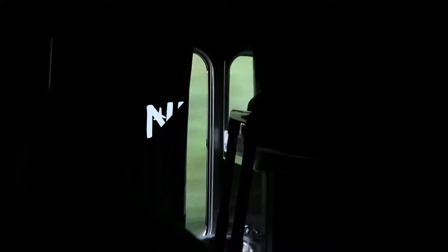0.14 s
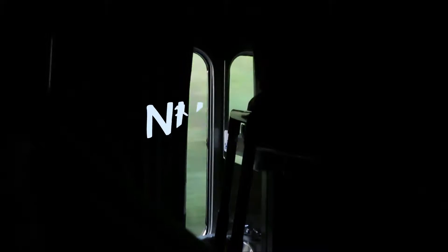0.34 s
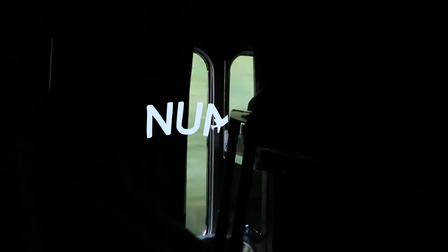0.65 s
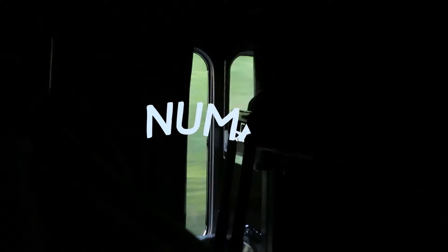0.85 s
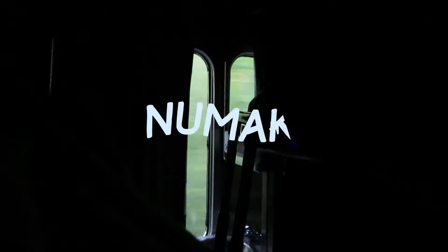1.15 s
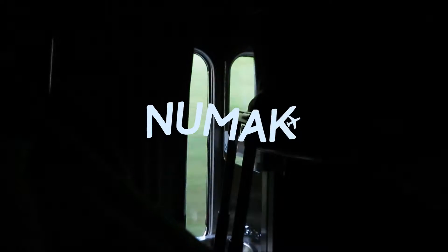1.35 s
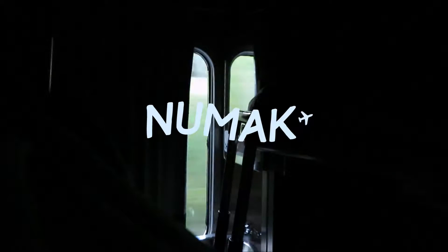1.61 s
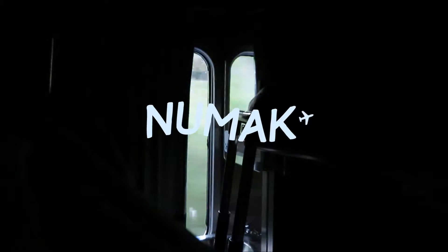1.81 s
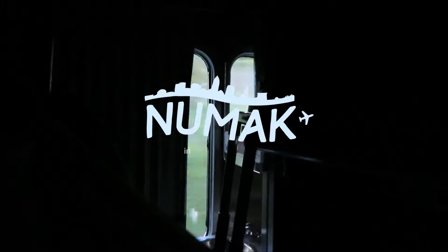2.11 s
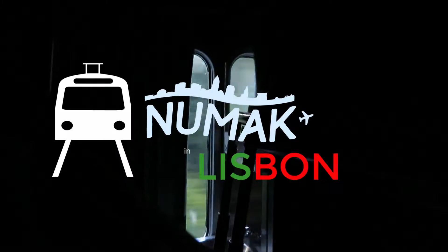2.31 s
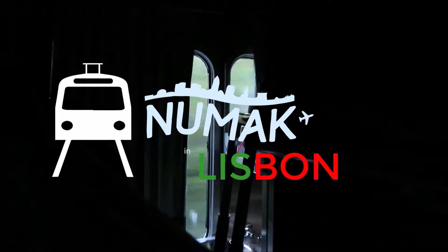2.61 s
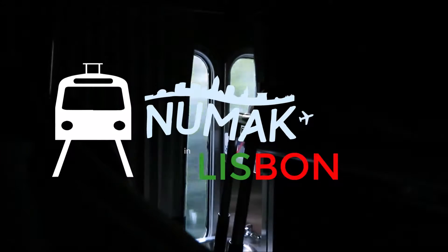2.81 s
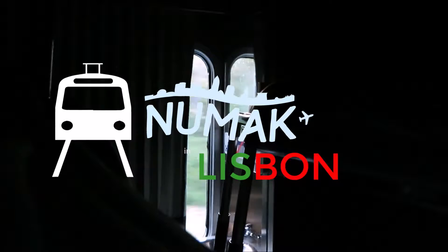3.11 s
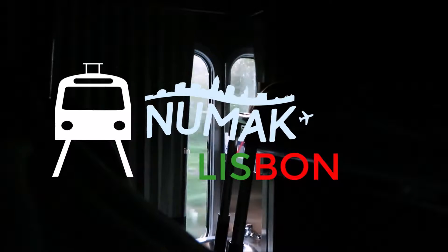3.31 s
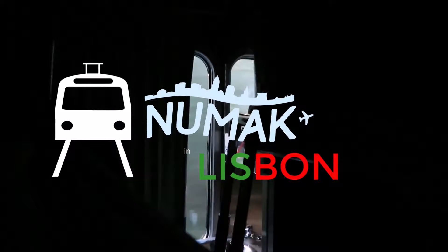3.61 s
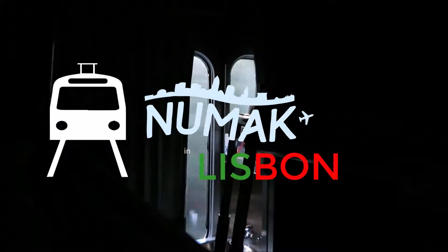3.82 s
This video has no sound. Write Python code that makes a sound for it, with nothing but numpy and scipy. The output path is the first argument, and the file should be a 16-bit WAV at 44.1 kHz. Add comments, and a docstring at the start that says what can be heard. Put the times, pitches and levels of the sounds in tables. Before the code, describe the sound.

A moving train heard from inside its carriage: continuous deep rumble and muffled rolling roar, wavering low hum, scattered dull knocks clustering past the middle, close stereo microphones, mostly centred low end.

```python
"""Wheels roll on rails, heard inside a moving train carriage as panel-coloured broadband noise.
The body booms and the floor drones as bands of noise; a low pulsation hums as sines in four orders.
Wall panels hum in two neighbouring bands, and fittings knock as decaying bands of noise.
Short gusts hiss past the door over a steady hiss of air, with one faint high tick."""
import sys
import numpy as np
from scipy import signal
from scipy.fft import rfft, irfft
from scipy.io import wavfile
from scipy.ndimage import uniform_filter1d

SR = 44100
rng = np.random.default_rng(int(sys.argv[2]) if len(sys.argv) > 2 else 0)


def digitize_waveform(pressure):
    """Quantize a signal to 16-bit integers and store it at the path in sys.argv[1].

    Rows of a 2-D input are taken as channels; values are limited to [-1, 1].
    """
    field = np.atleast_2d(pressure).T
    bounded = np.clip(field, -1, 1)
    quanta = np.round(bounded * 32767).astype(np.int16)
    wavfile.write(sys.argv[1], SR, quanta)


N = 174195  # length in samples


def amp(db):
    """Level law: amplitude ratio is 10^(level/20)."""
    return 10 ** (np.asarray(db) / 20)


def evened(x):
    """Normalization to unit rms."""
    return x / np.sqrt(np.mean(x ** 2) + 1e-20)


def read(points, hz, axis=1):
    """Linear interpolation of a table column along a logarithmic frequency axis."""
    table = np.array(points)
    return np.interp(np.log(hz + 1), np.log(table[:, 0] + 1), table[:, axis])


def curve(points, axis=1):
    """Linear interpolation of a table column over time."""
    table = np.array(points)
    return np.interp(np.arange(N) / SR, table[:, 0], table[:, axis])


def spectrum(points):
    """Spectral shape: gain over frequency from a table, zero outside its end points."""
    return lambda hz: amp(read(points, hz)) * (hz > points[0][0]) * (hz < points[-1][0])


def filtered(x, gain):
    """Zero-phase linear filtering: the spectrum is multiplied by a gain of frequency."""
    frequencies = np.fft.rfftfreq(x.shape[-1], 1 / SR)
    return irfft(rfft(x) * gain(frequencies), x.shape[-1])


def coloured(x, gain):
    """Spectral shaping of a mid/side pair, normalized to unit rms in the mid."""
    y = filtered(x, gain)
    return y / np.sqrt(np.mean(y[0] ** 2))


def slow(top_hz):
    """Low-pass random modulation of unit rms, with gain one half at top_hz."""
    lowpass = lambda hz: (hz > 0) / (1 + (hz / top_hz) ** 4)
    return evened(filtered(rng.standard_normal(N), lowpass))


# Close microphone pair: f/Hz, side re mid level/dB, correlation of side and mid [-1 to 1]
MICROPHONE_PAIR = [(100, -81, 0.01), (180, -76, 0.01), (260, -44, -.03), (335, -18.5, -0.16),
                   (503, -22.5, -0.16), (860, -18, -.65), (1300, -17, -.05), (2120, -17.5, -.1),
                   (3360, -7.5, -0.098), (6000, -4, -0.014), (12000, 1, 0.01)]


def pair():
    """Partial coherence: white noise as a mid and a partly correlated side, weaker at most frequencies."""
    mid, other = rng.standard_normal((2, N))
    correlation = lambda hz: np.clip(read(MICROPHONE_PAIR, hz, axis=2), -1, 1)
    independent = lambda hz: np.sqrt(1 - correlation(hz) ** 2)
    side = filtered(mid, correlation) + filtered(other, independent)
    side = filtered(side, lambda hz: amp(read(MICROPHONE_PAIR, hz)))
    return np.array([mid, side])


# Rolling roar over time: t/s, level/dB
ROAR_LEVEL = [(0.05, -42), (1.11, -42), (1.34, -41.5), (1.84, -41.5), (2.29, -41), (2.71, -41), (3.95, -41)]
# Spectral density of the roar before the panels: f/Hz, relative level/dB
ROAR_SPECTRUM = [(150, -8.5), (270, 2), (427, -4.5), (560, -6), (880, -10), (1190, -13.5), (2100, -17),
                 (2520, -20), (3100, -28), (4000, -39.5), (6000, -57.5)]
# Panels rung by the roar: centre f/Hz, width at half the lift f/Hz, lift level/dB
PANEL_RESONANCES = [(469.4, 8.6, 9), (704, 35, 4.5), (800, 21, 0.5), (1034, 77, 3.5), (1277, 35, 3),
                    (1455, 25, 7.5), (1590, 21, 6.5), (1698, 72, 3), (1826, 26, 6), (2000, 45, 7.5),
                    (2214, 39, 4.5), (2724, 37, 8.5), (2910, 30, 8.5), (372.7, 6.3, 3)]
PATCH_DB, FLICKER_DB = 1, 0.14  # rms


def roar():
    """Resonant transmission: rolling noise through panels, with drifting patches and a shared flicker."""
    bins = signal.stft(pair(), nperseg=512, noverlap=384)[2]
    patches = rng.standard_normal(bins.shape[1:])  # frequency by time, shared by mid and side
    patches = uniform_filter1d(patches, size=7, axis=0)
    patches = evened(uniform_filter1d(patches, size=25, axis=1))
    patchy = signal.istft(bins * amp(PATCH_DB * patches), nperseg=512, noverlap=384)[1][:, :N]

    def tone(hz):
        lift = sum(db / (1 + (2 * (hz - f) / width) ** 2) for f, width, db in PANEL_RESONANCES)
        return spectrum(ROAR_SPECTRUM)(hz) * amp(lift)

    return amp(curve(ROAR_LEVEL) + FLICKER_DB * slow(28.0)) * coloured(patchy, tone)


# Body boom over time: t/s, level/dB
BOOM_LEVEL = [(0, -35.5), (.2, -29), (.5, -31), (.9, -30), (1.25, -30), (1.45, -31.5), (1.54, -35.5),
              (1.68, -28.5), (2.05, -33), (2.35, -30.5), (2.5, -31.5), (2.99, -29.5), (3.22, -34),
              (3.44, -25), (3.6, -33), (3.8, -30.5), (3.95, -30)]
# Spectral density of the boom: f/Hz, relative level/dB
BOOM_SPECTRUM = [(15, 3.5), (25, -12.5), (31, -4.5), (38, -12), (55, -5), (66, -2.5), (80, -4.5),
                 (95, -4.5), (110, -6), (140, -7), (152, -7), (172, -6.5), (190, -11.5), (260, -26.5),
                 (400, -90)]
BOOM_FLUTTER_DB, BOOM_FLUTTER_HZ = 1.5, 26  # rms depth, top frequency


def boom():
    """Amplitude modulation: low noise of the carriage body, fluttering quickly."""
    level = curve(BOOM_LEVEL) + BOOM_FLUTTER_DB * slow(BOOM_FLUTTER_HZ)
    return amp(level) * coloured(pair(), spectrum(BOOM_SPECTRUM))


# Pulsation: t/s, second-order f/Hz, common level of orders 1-3/dB, fourth-order level/dB
HUM_COURSE = [(0, 46.4, -34.5, -38), (.35, 46.63, -42, -34.5), (.62, 46.56, -36, -39),
              (.9, 45.84, -46, -34.5), (1.05, 46.32, -46, -29.5), (1.25, 46.46, -27, -32.5),
              (1.6, 46.62, -40, -36.5), (1.85, 46.6, -36.5, -34), (2.1, 47.33, -30, -37.5),
              (2.19, 47.36, -32.5, -22.5), (2.28, 47.4, -28, -40), (2.55, 47.6, -34.5, -33),
              (2.85, 47.38, -33, -36), (3.06, 47.48, -27.5, -38), (3.2, 47.3, -35.5, -53),
              (3.55, 49.18, -26.5, -43.5), (3.95, 47.7, -37.5, -38.5)]
# Orders 1-3: multiple of the second-order frequency, level re common level/dB, rms waver/dB
LOWER_ORDERS = [(.5, -11.5, 0), (1, -1.9, 2), (1.5, -6.5, 4.5)]
WOBBLE = .03  # rms share of pitch


def hum():
    """Harmonic series: wavering sines on the orders of one pulsation, the fourth with its own level."""
    turns = np.cumsum(curve(HUM_COURSE) * (1 + WOBBLE * slow(4.65))) / SR
    lower = 0
    for multiple, db, waver_db in LOWER_ORDERS:
        sine = np.sin(2 * np.pi * (multiple * turns + rng.random()))
        lower = lower + amp(db + waver_db * slow(4.3)) * sine
    fourth = amp(curve(HUM_COURSE, axis=3)) * np.sin(2 * np.pi * (2 * turns + rng.random()))
    mid = np.sqrt(2) * (amp(curve(HUM_COURSE, axis=2)) * lower + fourth)  # sqrt(2): peak from rms
    return np.outer([1, 0], mid)  # no side


# Floor drone over time: t/s, level/dB
DRONE_LEVEL = [(0, -40.5), (.3, -41), (.45, -36.5), (.65, -38), (.92, -42), (1.0, -32), (1.15, -38.5),
               (1.5, -33.5), (1.9, -40.5), (2.14, -35.5), (2.32, -42.5), (2.52, -39.5), (2.8, -36),
               (3.2, -37), (3.34, -42), (3.43, -32.5), (3.58, -36), (3.95, -39)]
# Spectral density of the drone: f/Hz, relative level/dB
DRONE_SPECTRUM = [(150, -40), (190, -8), (202, -2.5), (214, -1.5), (236, 0), (248, -4), (262, -13),
                  (320, -40)]


def drone():
    """Narrow-band noise: the floor drones in a limited band with a changing level."""
    return amp(curve(DRONE_LEVEL)) * coloured(pair(), spectrum(DRONE_SPECTRUM))


# Wall panel hum over time: t/s, level/dB
WALL_LEVEL = [(0, -48), (.6, -54), (1.15, -52.5), (1.3, -45), (1.45, -49), (1.6, -48.5), (2.05, -52),
              (2.17, -41), (2.25, -54.5), (3, -51), (3.45, -55.5), (3.95, -54)]
# Spectral density of the wall hum: f/Hz, relative level/dB
WALL_SPECTRUM = [(560, -29), (650, -6.5), (680, -1.3), (750, -11.5), (820, 0), (880, -11.5), (950, -35)]


def wall():
    """Band-limited noise: the wall panels hum in two neighbouring bands, near 680 and 820 Hz."""
    return amp(curve(WALL_LEVEL)) * coloured(pair(), spectrum(WALL_SPECTRUM))


# Knocks: start t/s, nominal level/dB, centre f/Hz, width at half gain f/Hz, 60 dB decay t/s
KNOCK_EVENTS = [(0.091, -32.5, 164, 34, 0.73), (.15, -45.5, 1450, 1300, 0.23), (.771, -33.5, 400, 250, .17),
                (.772, -48, 2200, 700, .2), (.788, -44, 1100, 1100, .2), (1.185, -45.5, 1870, 1299, 0.74),
                (2.132, -46, 747.6, 432, 0.25), (2.189, -41, 748, 378, 0.13), (2.322, -38.5, 1450, 300, .1),
                (2.327, -33, 640, 350, .1), (2.344, -36, 600, 300, .08), (2.363, -33, 830, 250, .11),
                (2.364, -45, 1600, 1000, .15), (2.452, -39.5, 704, 430.5, 0.16),
                (2.607, -41, 1922, 800, 0.14), (3.029, -43, 600, 315, 0.23), (3.255, -27.5, 226, 24, .5),
                (3.335, -27.5, 236, 24, .5), (2.388, -43, 1050, 300, .1), (2.745, -49, 902, 648.1, .15),
                (3.341, -42, 646.5, 350, 0.26), (3.405, -46, 189.4, 80, 0.68), (3.41, -36, 547, 593, .35),
                (3.46, -48, 699.4, 499.7, 0.17)]
KNOCK_RISE_S = 0.0022
KNOCK_RING = .85  # share of steady ringing, 0-1


def knocks():
    """Exponential decay: each dull blow is a ringing band of noise that starts fast and dies."""
    t, noise, out = np.arange(N) / SR, pair(), np.zeros((2, N))
    for start, db, centre, width, t60 in KNOCK_EVENTS:
        first = round(start * SR)
        age = t[:SR // 2][:N - first]  # at most half a second
        span = slice(first, first + len(age))
        band = coloured(noise[:, span], lambda f: 1 / (1 + (2 * (f - centre) / width) ** 4))
        # Dividing by the mid's envelope steadies the ringing.
        envelope = abs(signal.hilbert(band[0])) + .1
        ringing = np.sqrt(2) ** KNOCK_RING * band / envelope ** KNOCK_RING
        out[:, span] += np.minimum(age / KNOCK_RISE_S, 1) * amp(db - 60 * age / t60) * ringing
    return out


# Gusts: hold start t/s, level/dB, rise constant t/s, hold t/s, fall constant t/s,
# centre of spectral lift f/Hz, lift level/dB
GUST_EVENTS = [(1.172, -50.8, .026, .02, .018, 5400, 7.5), (2.488, -50, .008, .025, .03, 3900, 5.5),
               (1.295, -60, .006, .01, .015, 3500, 4)]
# Spectral density of the gusts before the lift: f/Hz, relative level/dB
GUST_SPECTRUM = [(1300, -16), (2100, -4), (2850, 0), (3600, -9), (5400, -15.5), (7000, -23), (10000, -30),
                 (13000, -44)]
GUST_WIDTH_HZ = 500  # 1/e half-width of the lift
GUST_FLUTTER_DB, GUST_FLUTTER_HZ = 1.5, 90  # rms depth, top frequency


def gusts():
    """Enveloped broadband noise: bright hiss swells exponentially, holds and fades."""
    t, noise, out = np.arange(N) / SR, pair(), 0
    for start, db, rise, hold, fall, lift_hz, lift_db in GUST_EVENTS:
        before, after = np.maximum(start - t, 0), np.maximum(t - start - hold, 0)
        shape = np.exp(-before / rise - after / fall)

        def tone(hz):
            lift = lift_db * np.exp(-((hz - lift_hz) / GUST_WIDTH_HZ) ** 2)
            return spectrum(GUST_SPECTRUM)(hz) * amp(lift)

        level = db + GUST_FLUTTER_DB * slow(GUST_FLUTTER_HZ)
        out = out + amp(level) * shape * coloured(noise, tone)
    return out


# Tick: centre t/s, level/dB, centre f/Hz, 1/e half-width f/Hz
TICK_EVENT = (2.373, -71, 11500, 5000)
TICK_S = .007  # 1/e half-duration


def tick():
    """Gaussian pulse: one faint, very high burst of noise, bell-shaped in time and frequency."""
    centre_s, db, hz, width = TICK_EVENT
    shape = np.exp(-((np.arange(N) / SR - centre_s) / TICK_S) ** 2)
    return amp(db) * shape * coloured(pair(), lambda f: np.exp(-((f - hz) / width) ** 2))


# Spectral density of the air hiss: f/Hz, relative level/dB
AIR_SPECTRUM = [(2000, -13.5), (3300, -0.5), (4800, -4.5), (6000, -8.5), (7500, -13.5), (10000, -18),
                (13000, -23), (15200, -30)]
AIR_DB = -63


def air():
    """Stationary broadband noise: a nearly even hiss of air along the door."""
    return amp(AIR_DB + 0.15 * slow(14)) * coloured(pair(), spectrum(AIR_SPECTRUM))


def scene():
    """Superposition: all sources add as mid and side, then turn to left and right."""
    mid, side = roar() + boom() + hum() + drone() + wall() + knocks() + gusts() + tick() + air()
    return np.array([mid + side, mid - side])


EDGE_HZ = 15100


def record(dry):
    """Band limitation: a zero-phase elliptic low-pass cuts steeply above its edge."""
    lowpass = signal.ellip(8, .1, 60, EDGE_HZ, fs=SR, output="sos")
    return signal.sosfiltfilt(lowpass, dry)


dry = scene()
out = record(dry)
digitize_waveform(out)
```